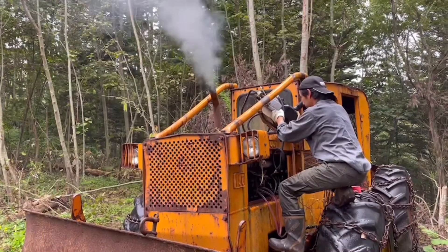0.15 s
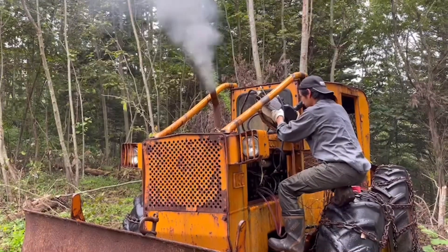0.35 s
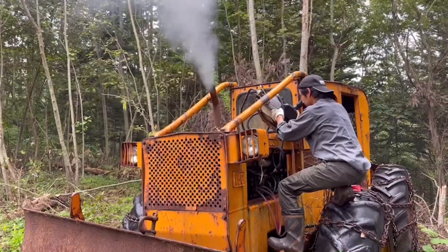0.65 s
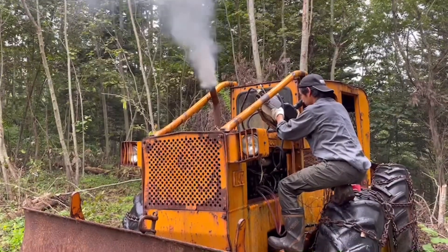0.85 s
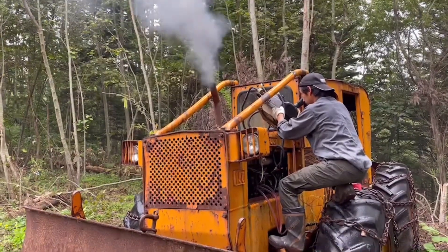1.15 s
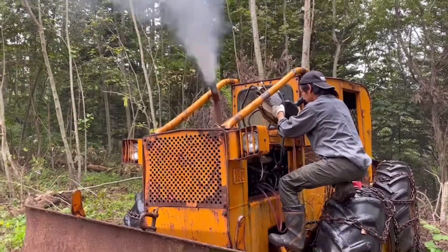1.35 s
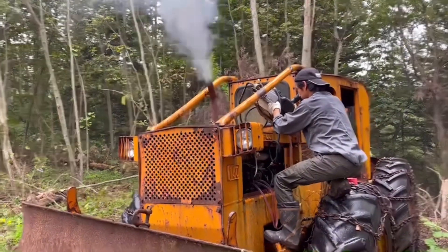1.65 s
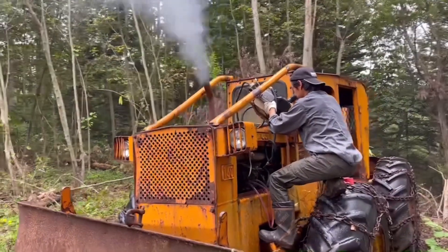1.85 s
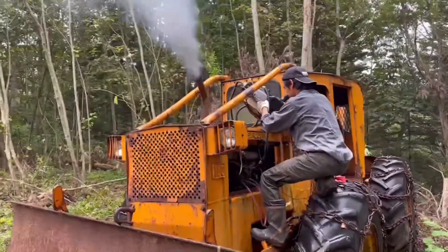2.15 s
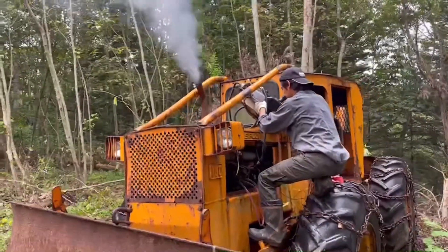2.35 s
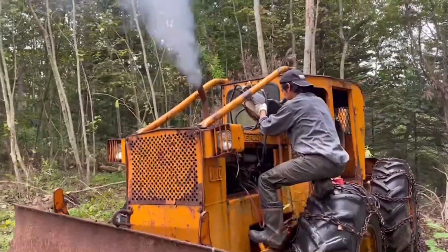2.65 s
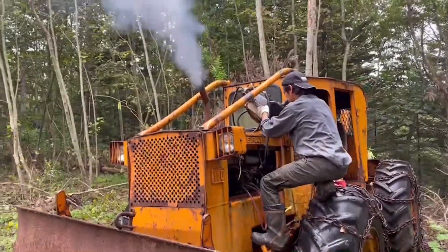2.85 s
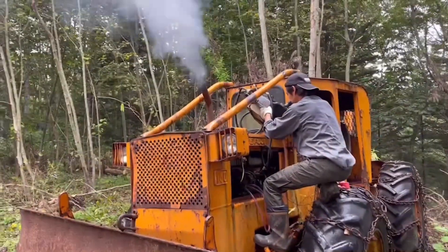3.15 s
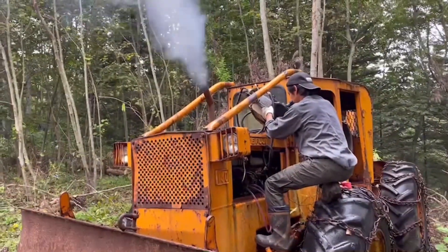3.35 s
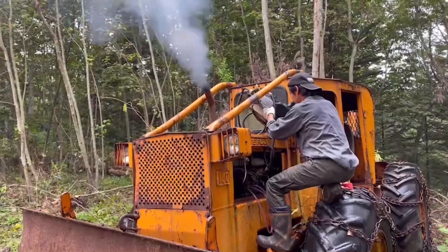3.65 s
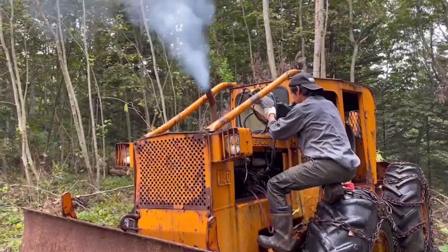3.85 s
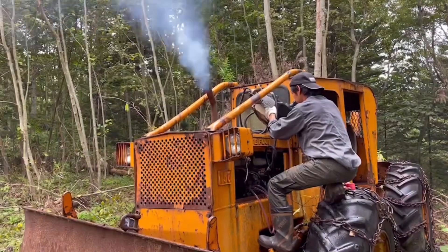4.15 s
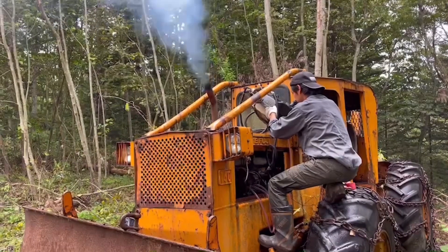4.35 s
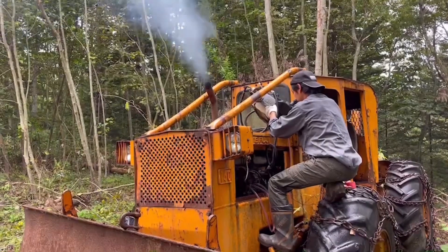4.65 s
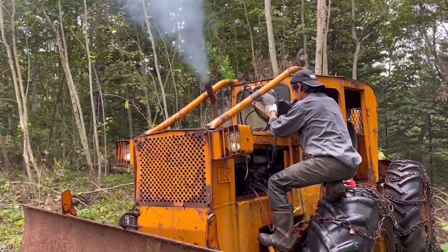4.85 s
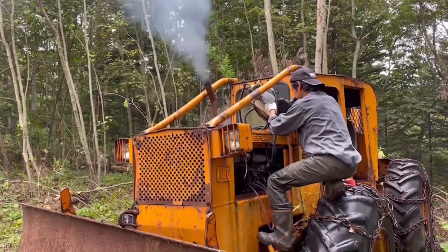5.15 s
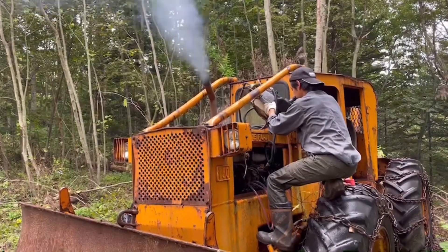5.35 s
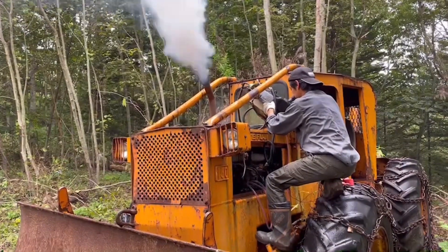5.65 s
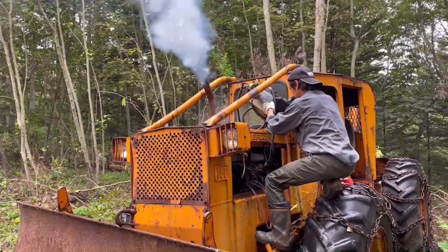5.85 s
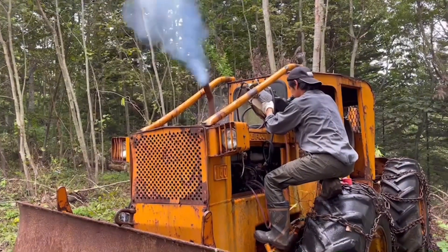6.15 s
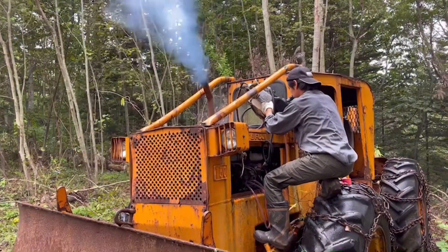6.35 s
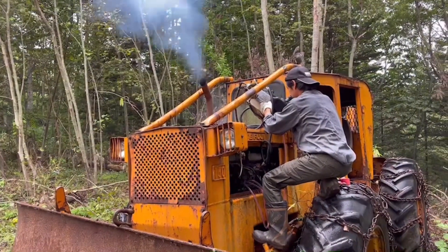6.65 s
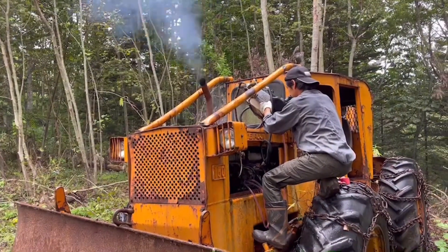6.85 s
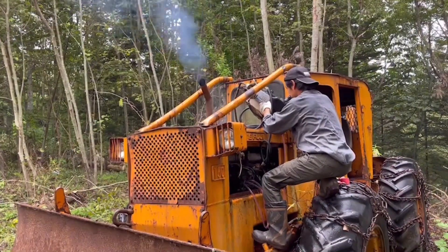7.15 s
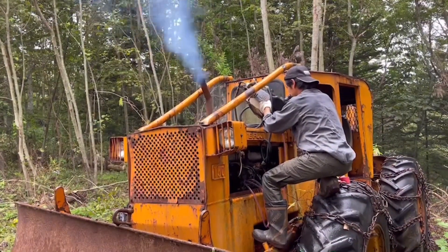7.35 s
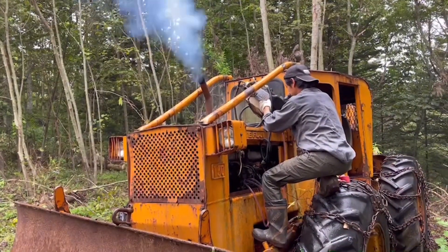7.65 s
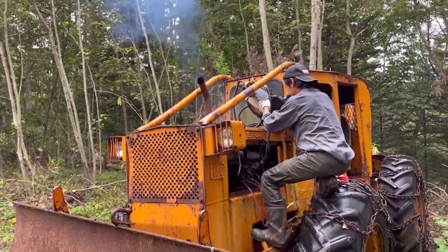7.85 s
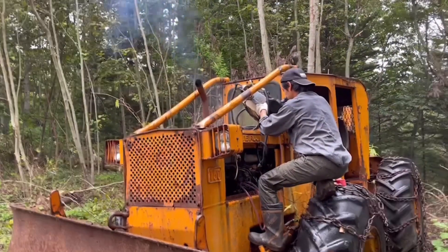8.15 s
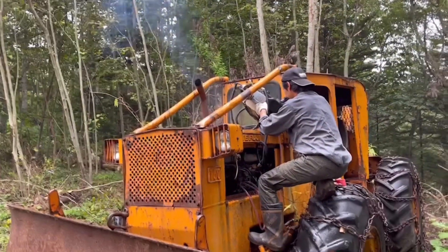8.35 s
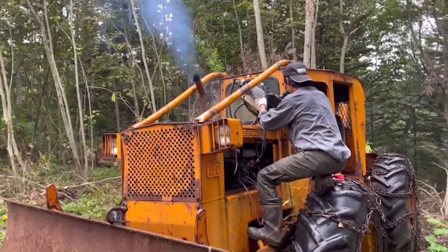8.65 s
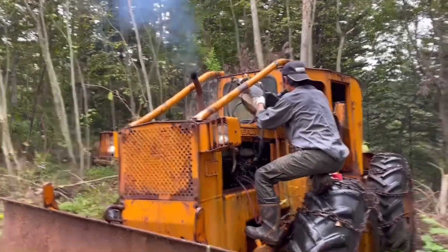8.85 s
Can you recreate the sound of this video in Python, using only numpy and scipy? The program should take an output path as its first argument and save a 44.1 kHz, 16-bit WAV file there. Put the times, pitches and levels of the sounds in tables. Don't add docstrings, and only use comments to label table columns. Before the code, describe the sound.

Ragged diesel pops and clatter over low pipe thumps and a fuzzy drone; the engine gathers speed, drops out twice and catches again.

```python
import sys
import numpy as np
from scipy import signal
from scipy.fft import irfft, next_fast_len
from scipy.io import wavfile
from scipy.ndimage import uniform_filter1d, minimum_filter1d

SR = 44100
rng = np.random.default_rng(int(sys.argv[2]) if len(sys.argv) > 2 else 0)


def wav_out(sig):
    wavfile.write(sys.argv[1], SR, np.round(np.clip(np.atleast_2d(sig).T, -1, 1) * 32767).astype(np.int16))


def level_to_linear(level):
    exponent = np.asarray(level, float) / 20
    return 10 ** exponent


N = 396459

# start_s, turns_per_minute
CRANK_SPEED = [(0.0, 549.51), (0.42, 530.47), (1.32, 773.06), (1.56, 773.5), (2.4, 917.59), (3.64, 1217.81),
               (4.27, 952.67), (4.59, 1013.12), (4.95, 1053.51), (5.41, 1204.67), (5.77, 1401.27),
               (6.55, 1134.88), (6.78, 1281.85), (7.09, 1362.29), (7.58, 1248.17), (8.36, 1353.92),
               (8.6, 1267.49), (8.99, 1340.4)]
# start_s, burn_db of a sound cylinder
FUEL_RACK = [(0, -15), (3.42, -15), (3.64, -22), (3.72, -50), (4.15, -50), (4.24, -14.5), (5.66, -15),
             (5.8, -40), (6.28, -40), (6.38, -19), (6.7, -13.5), (6.95, -17), (7.05, -30), (7.4, -26),
             (7.6, -16), (8.12, -16.5), (8.4, -25), (8.75, -21)]
# start_s, thump_db
PIPE_PRESSURE = [(1.25, -26.3), (2.1, -28.7), (3.6, -25), (3.84, -35), (4.18, -35), (4.25, -28),
                 (5.76, -21.5), (6.11, -55), (6.38, -40), (6.66, -20.5), (6.98, -19.5), (7.24, -32.5),
                 (7.58, -32), (7.79, -22), (8.1, -22), (8.45, -29.5), (8.83, -24.5), (8.99, -32)]
# pitch_hz, t60_s
GAS_T60 = [(300, 0.1), (1000, 0.078), (2500, 0.052), (6000, 0.065), (12000, 0.072)]
EASY_RPM = 880
BANDS_HZ = np.geomspace(300, 14000, num=12)


def evened(x):
    return x / np.sqrt(np.mean(x ** 2) + 1e-20)


def read(points, hz):
    f, value = np.transpose(points)
    return np.interp(np.log(hz + 1), np.log(f + 1), value)


def curve(points, s):
    return np.interp(s, *np.transpose(points))


def heat(s):
    # start_s, end_s
    warm_s = (5.58, 5.7)
    return np.interp(s, warm_s, [0, 1])


def wake(t, db):
    return db * np.exp(-t / 0.07)


def firings():
    late_share = [0, 0.054, -0.04, 0.106, 0.06, 0.113]
    cold_cylinder_db = [4.8, -32, -30, 0.1, -4, -36]
    hot_cylinder_db = [-4, -14, -3.5, -8, -15, -30]
    unlit_cylinder_db = [-40, -38, -29, -44, -45, -48]
    # cold_db, hot_db
    scatter_db = [(.7, 1.3), (4, 4), (2.5, 1.3), (1.1, 1.4), (1.2, 4), (4, 5)]
    # start_s, burn_db
    first_blasts = [(3.22, -12), (3.43, -12.5), (4.67, -11), (5.12, -10.5), (5.62, -11.5), (6.45, -20.5),
                    (7.49, -24.5), (7.58, -19.5), (7.68, -17.5), (7.86, -18.5), (8.96, -22)]
    # start_s, burn_db
    second_catches = [(.74, -23), (.92, -23), (1.1, -22), (1.26, -23), (2.01, -20.5), (3.02, -23),
                      (3.35, -21.5), (3.55, -21), (3.86, -25.5), (4.57, -22), (5.03, -20.5), (5.14, -22.5),
                      (5.35, -23), (5.45, -19.5), (5.54, -21), (5.64, -22), (5.72, -19.5), (6.67, -20),
                      (6.77, -19), (6.96, -19.5), (7.97, -22)]
    third_catches = [(5.65, -17.5), (5.74, -16.5), (5.83, -19.5), (6.28, -21.5), (5.91, -26), (6.48, -27),
                     (6.59, -16.5), (6.79, -13.5), (6.88, -14.5), (6.97, -18), (7.06, -22.5), (7.33, -24),
                     (8.35, -22), (8.53, -24), (8.62, -39), (8.72, -21), (8.81, -19.5), (8.9, -42)]
    fifth_catches = [(1.18, -17.5), (1.34, -17), (1.5, -14.5), (5.68, -19), (6.62, -23.5), (6.72, -22.5),
                     (6.82, -18.5), (6.91, -23), (7.18, -41), (7.55, -41), (7.74, -21), (8.02, -23),
                     (8.75, -25)]
    sixth_catches = [(.02, -30), (2.11, -25), (3.31, -24), (3.52, -27), (4.99, -28), (5.21, -26),
                     (5.52, -26), (5.7, -24), (5.78, -23.5), (6.83, -27), (6.93, -23), (7.75, -23),
                     (8.03, -20.5), (8.21, -26), (8.76, -21.5)]
    # start_s, burn_db
    fourth_relights = [
        (2.06, -11.5),
        (2.47, -12.5),
        (4.24, -10.5),
        (5.38, -12),
        (5.48, -13.5),
        (7.16, -36),
    ]
    first_cycle = -0.2375
    sag_db_per_rpm = 0.014

    t = np.arange(N) / SR
    cycles = first_cycle + np.cumsum(curve(CRANK_SPEED, t)) / (120 * SR)
    count = np.arange(int(6 * cycles[-1]))
    which = count % 6
    s = np.interp((count + np.take(late_share, which)) / 6, cycles, t)

    hot = heat(s)
    hurry_rpm = np.maximum(curve(CRANK_SPEED, s) - EASY_RPM, 0)
    cold_db = np.take(cold_cylinder_db, which) - (which == 0) * sag_db_per_rpm * hurry_rpm
    lit_db = curve(FUEL_RACK, s) + (1 - hot) * cold_db + hot * np.take(hot_cylinder_db, which)
    unlit_db = np.take(unlit_cylinder_db, which) - 3.5 * hot
    cold_spread, hot_spread = np.take(scatter_db, which, axis=0).T
    spread_db = (1 - hot) * cold_spread + hot * hot_spread
    chance = np.minimum(rng.standard_normal((2, len(s))), 1.1)
    burn_db = np.maximum(lit_db + spread_db * chance[0], unlit_db + 4.5 * chance[1])

    for cylinder, rows in ((0, first_blasts), (1, second_catches), (2, third_catches),
                           (4, fifth_catches), (5, sixth_catches), (3, fourth_relights)):
        for when, db in rows:
            burn_db[np.argmin(abs(s - when) + (which != cylinder))] = db
    return np.clip(np.round(s * SR).astype(int), 0, N - 1), burn_db


def swell(at, size, rise_s, t60, open_turns=0.076):
    hold = (open_turns * SR * 60 / curve(CRANK_SPEED, at / SR)).astype(int) + 1
    start = np.clip(at - (.5 * np.maximum(hold - 190, 0)).astype(int), 0, N - 1)
    steps = np.zeros(2 * N)
    np.add.at(steps, start, size / hold)
    np.add.at(steps, start + hold, -size / hold)
    valve_open = np.cumsum(steps[:N])
    rise = np.exp(-1 / (rise_s * SR))
    fall = np.exp(-np.log(1000) / (t60 * SR))
    return signal.lfilter([1 - rise], np.convolve([1, -rise], [1, -fall]), valve_open)


def port_noise():
    # pitch_hz, likeness (0 to 1)
    likeness = [(1100, 1), (1700, .85), (5000, .8), (7100, .7), (7800, .996), (8900, .996), (9900, .7),
                (11000, .99), (12200, .98), (13200, .45), (13900, .997)]
    # pitch_hz, lead_radians
    left_lead = [(1200, 0), (2000, .8), (2900, 1.4), (3800, .5), (5400, .5), (6000, 0), (6900, -.9),
                 (7800, -3.13), (8800, -3.15), (9500, -4), (10800, -6.2), (12300, -6.35), (13000, -7),
                 (13900, -9.42)]
    # pitch_hz, level_db
    left_tilt = [(1500, -.7), (1780, -6), (2100, 0), (2600, 1), (3150, 5), (3600, 2), (4300, 3), (5000, 1),
                 (7400, 2.5), (7800, 0)]
    hz = np.fft.rfftfreq(next_fast_len(N), 1 / SR)
    a, b, c, d = rng.standard_normal((4, len(hz)))
    same = np.clip(read(likeness, hz), 0, 1)
    left = a + 1j * b
    shared = same * left * np.exp(-1j * read(left_lead, hz))
    right = shared + np.sqrt(1 - same ** 2) * (c + 1j * d)
    ground = 1 + 0.32 * np.exp(-(hz / 2600) ** 2 - 2j * np.pi * hz / 365)
    return hz, np.array([left, right]) * level_to_linear(read(left_tilt, hz) * [[.5], [-.5]]) * ground


def gas_bands():
    # pitch_hz, level_db (per Hz)
    gas_colour = [(200, -19.5), (500, -8.5), (1000, -8.5), (2000, -3), (3300, -1), (4000, -5), (5500, -8),
                  (7500, -8.5), (10500, -11), (13000, -21)]
    # pitch_hz, width_hz, level_db
    stack_rings = [(840, 50, -3), (1070, 80, 5.5), (1870, 53, -0.5), (2430, 350, 3), (3310, 67, -5.5),
                   (5430, 200, -10)]
    hz, z = port_noise()
    rings = sum(level_to_linear(db) / np.sqrt(1 + (2 * (hz - f) / w) ** 2) for f, w, db in stack_rings)
    z = z * level_to_linear(read(gas_colour, hz)) * (1.04 + rings)
    z *= 1 + 1.6 * np.exp(-((hz - 15300) / 1000) ** 2)
    z /= np.sqrt(np.mean(irfft(z) ** 2))
    ragged = level_to_linear(2.7 * evened(uniform_filter1d(rng.standard_normal(N), 60)))
    bands = []
    for k, one in enumerate(np.eye(len(BANDS_HZ))):
        share = np.interp(np.log(hz + 1), np.log(BANDS_HZ), one)
        bands.append(np.roll(ragged, 20000 * (k // 3)) * irfft(z * share)[:, :N])
    return bands


def pops(at, burn_db, hz):
    cylinder_voice = [1790, 1970, 2200, 3340, 1880, 2380]
    voice = np.exp(-(np.log(hz / np.resize(cylinder_voice, len(at))) / 0.49) ** 2)
    chance_db = 2.8 * rng.standard_normal(len(at))
    size = level_to_linear(1.7 * (burn_db + 14) - 8.0 + 2.6 * voice + chance_db)
    return swell(at, size, 0.00043, 0.6 * read(GAS_T60, hz))


def clatter_level():
    t = np.arange(N) / SR
    hot = heat(t)
    full_fuel_db = np.interp(hot, [0, 1], (-33.5, -31.3))
    follows_fuel = np.interp(hot, [0, 1], (.085, .39))
    slow_rpm = np.minimum(curve(CRANK_SPEED, t) - EASY_RPM, 0)
    return level_to_linear(full_fuel_db + follows_fuel * (curve(FUEL_RACK, t) + 15) - .017 * slow_rpm + wake(t, 10.5))


def clatter(at, burn_db, ticks, level, hz):
    valve_db = [-5, 0, 7, 5.5, -6.5, 4]
    # pitch_hz, level_db
    clatter_colour = [(300, 12.5), (600, 5), (1100, 2.5), (1600, -3), (2500, -5), (4000, -8.5),
                      (5300, -0.5), (7500, -4.5), (10500, 0.5), (14000, -4)]
    ticks_db = np.resize(valve_db, len(ticks)) + 20 * np.log10(level[ticks])
    puffs_db = np.append(0.79 * (burn_db + 30.5) - 36., ticks_db)
    puffs_db += 4.5 * rng.standard_normal(len(puffs_db))
    puffs = swell(np.append(at, ticks), level_to_linear(puffs_db), 0.00055, 1.22 * read(GAS_T60, hz))
    return level_to_linear(read(clatter_colour, hz)) * (level_to_linear(-11.5) * level + puffs)


def exhaust(at, burn_db):
    stray = np.diff(at) * rng.uniform(-0.25, 0.45, len(at) - 1)
    ticks = ((at[1:] + at[:-1]) / 2 + stray).astype(int)
    level = clatter_level()
    out = np.zeros((2, N))
    for hz, gas in zip(BANDS_HZ, gas_bands()):
        out += gas * np.hypot(pops(at, burn_db, hz), clatter(at, burn_db, ticks, level, hz))
    return out


def clearing(x):
    at = np.arange(500, 16000, 22) + rng.integers(0, 22, 705)
    taps = np.zeros(16100)
    taps[at] = rng.choice([-1., 1.], 705) * level_to_linear(-60 * at / SR / 0.42)
    return signal.fftconvolve(x, taps[None] / np.linalg.norm(taps), axes=1)[:, :N]


def thump(at, burn_db):
    # multiple of its note, level_db, t60_s
    pipe_overtones = [(1, 0, .14), (2, -4, .07), (3, -2, .07), (4, -10, .055), (5, -14, .045),
                      (7, -14, .05)]
    # pitch_hz, overtones_db
    pipe_state = [(57, -6), (65, -2.1)]
    even = signal.savgol_filter(at.astype(float), 25, 2).astype(int)
    even = np.clip(even, 0, N - 1)
    size = level_to_linear(.6 * burn_db + rng.standard_normal(len(at)))
    hot = np.clip(even / SR / 7.5, 0, 1)
    t = np.arange(9000) / SR
    late = np.maximum(t - .008, 0)
    x = np.zeros(N)
    for (note_hz, bright_db), share in zip(pipe_state, (1 - hot, hot)):
        clicks = np.zeros(N)
        clicks[even] = size * share
        ring = np.zeros(len(t))
        for k, db, t60 in pipe_overtones:
            decay = level_to_linear(db + bright_db * (k > 1) - 60 * late / t60)
            ring += decay * np.cos(2 * np.pi * k * note_hz * (t - .0115))
        x += signal.oaconvolve(clicks, ring * (1 - np.exp(-late / 0.0079)))[:N]
    x = signal.sosfiltfilt(signal.butter(3, 40, "high", fs=SR, output="sos"), x)
    slow = np.sqrt(uniform_filter1d(uniform_filter1d(x ** 2, 9000), 9000) + 1e-9)
    return level_to_linear(2.5) * level_to_linear(curve(PIPE_PRESSURE, np.arange(N) / SR)) * x / slow


def rumble(at):
    # pitch_hz, level_db (per Hz)
    drone_colour = [(26, -48), (45, -12), (146, -4), (183, 1.5), (281, -9), (343, -50), (404, -15),
                    (518, -14), (566, -18), (900, -23.5), (1170, -57), (1980, -120)]
    hz, z = port_noise()
    drone = evened(irfft(z * level_to_linear(read(drone_colour, hz)))[:, :N])
    beat = 0.81 + swell(at, rng.uniform(0.06, 1.04, len(at)), 0.0069, 0.24)
    t = np.arange(N) / SR
    level_db = -32.3 + .15 * (curve(PIPE_PRESSURE, t) + 28)
    level_db += .014 * abs(curve(CRANK_SPEED, t) - EASY_RPM - 120)
    level_db += wake(t, 17.5) - 9 * np.maximum(.9 - t, 0)
    return level_to_linear(level_db) * drone * evened(beat)


def scene():
    at, burn_db = firings()
    gas = exhaust(at, burn_db)
    return gas + level_to_linear(-19.5) * clearing(gas) + thump(at, burn_db) + rumble(at)


def band_limit(x):
    return signal.sosfilt(signal.butter(12, 15840, fs=SR, output="sos"), x)


def record(dry):
    # low_hz, high_hz, signal (0 sum, 1 difference)
    dropouts = [(7750, 9250, 0), (13500, 17000, 0), (10700, 12800, 1)]
    # low_hz, high_hz
    edge_wander = [(120, 280), (450, 0.1), (200, 200)]
    peak_db = 20 * np.log10(-minimum_filter1d(-abs(dry).max(0), 200) + 1e-9)
    left, right = dry / level_to_linear(.8 * uniform_filter1d(np.maximum(peak_db + 2.5, 0), 200))
    hz, t, z = signal.stft([left + right, left - right], SR, nperseg=1024)
    bright = np.log(np.sum(abs(z[1][hz > 6000]) ** 2, axis=0) + 1e-12)
    jump = .14 * (bright - uniform_filter1d(bright, 9))
    shut = uniform_filter1d(rng.standard_normal((3, len(t))), 3) + jump < [[.4], [.5], [.3]]
    wander = 2 * uniform_filter1d(rng.standard_normal((3, 2, len(t))), 4)
    wander *= np.array(edge_wander)[..., None]
    for (lo, hi, which), frames, (low, high) in zip(dropouts, shut, wander):
        z[which] *= 1 - (hz[:, None] > lo + low) * (hz[:, None] < hi + high) * frames
    z = z * (hz < 15750)[:, None]
    mid, side = signal.istft(z, SR, nperseg=1024)[1][:, :N] / 2
    return band_limit(np.array([mid + side, mid - side]))


dry = scene()
out = record(dry)
wav_out(out)
```